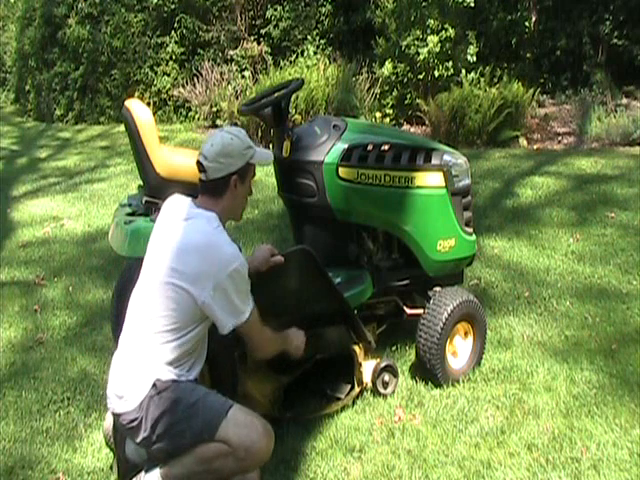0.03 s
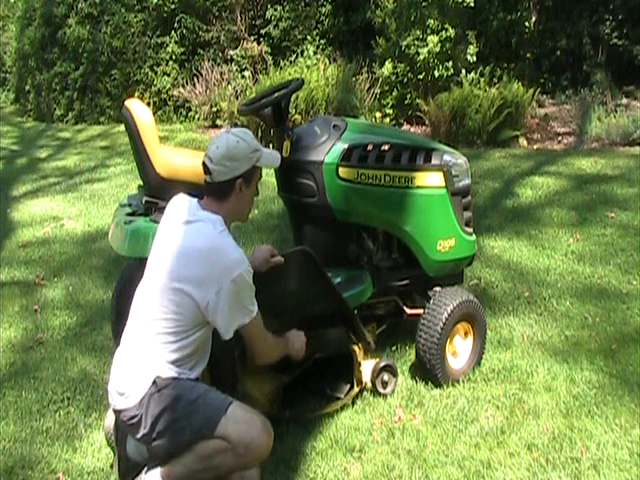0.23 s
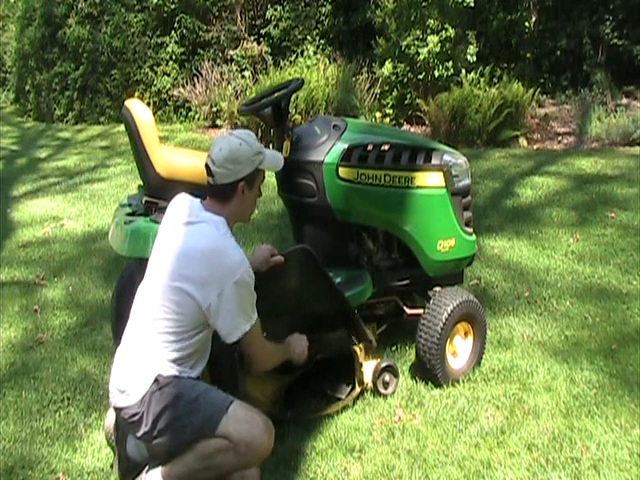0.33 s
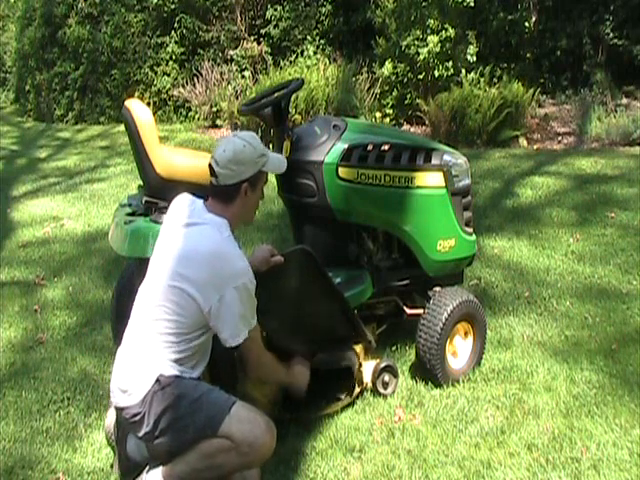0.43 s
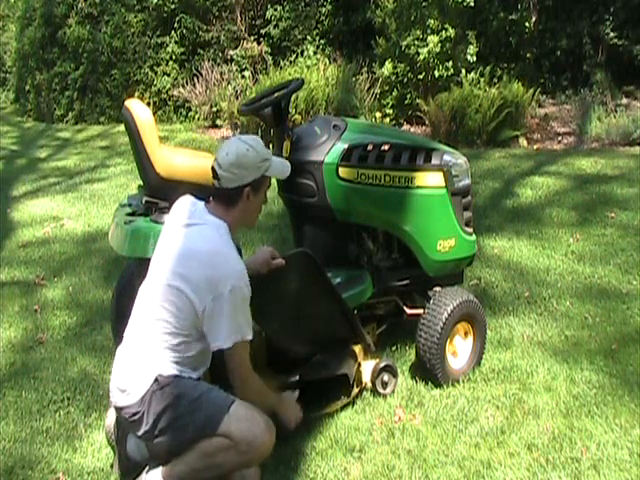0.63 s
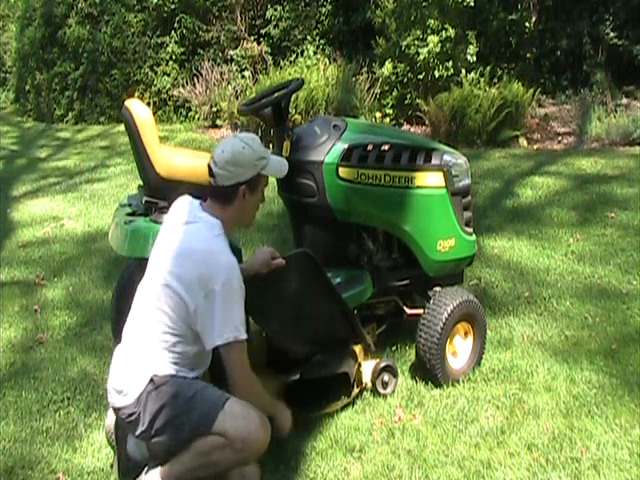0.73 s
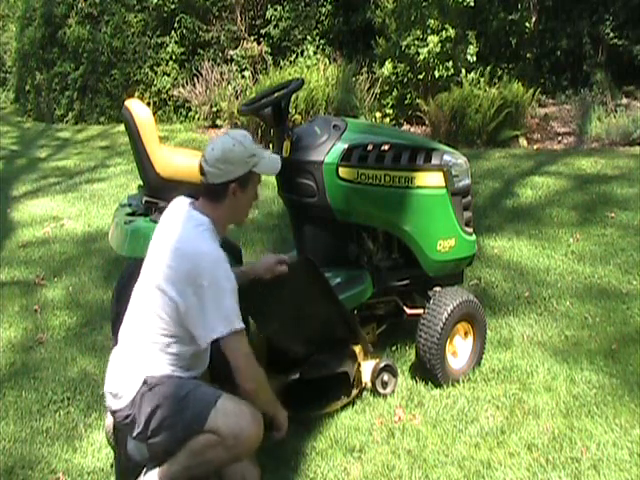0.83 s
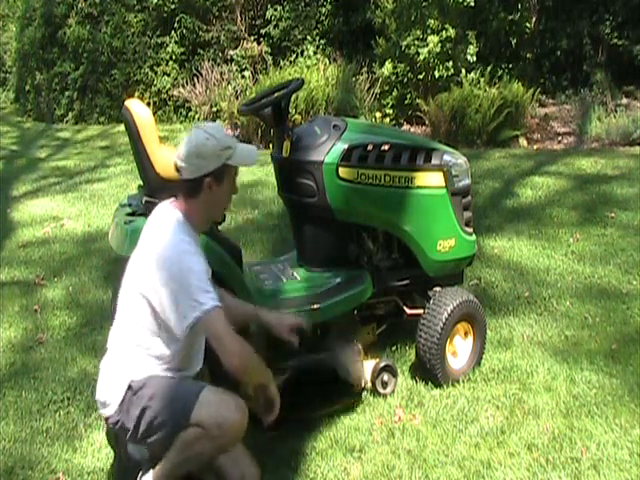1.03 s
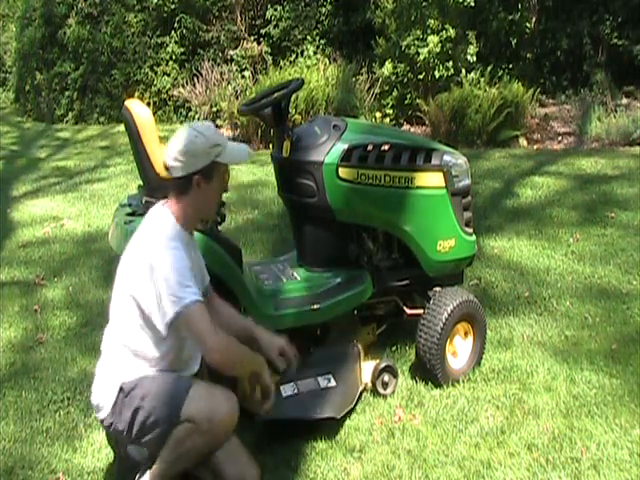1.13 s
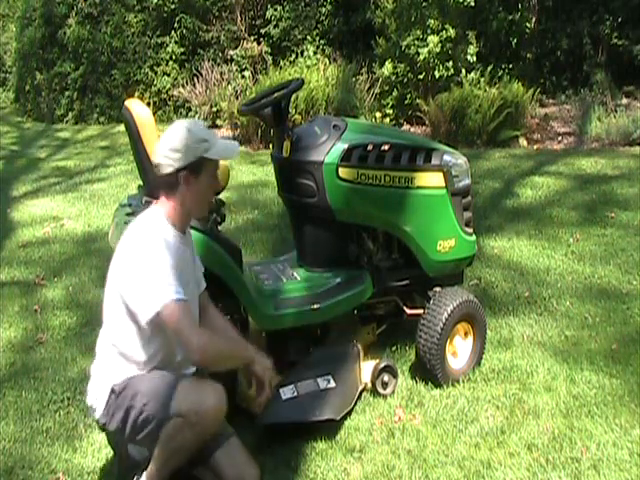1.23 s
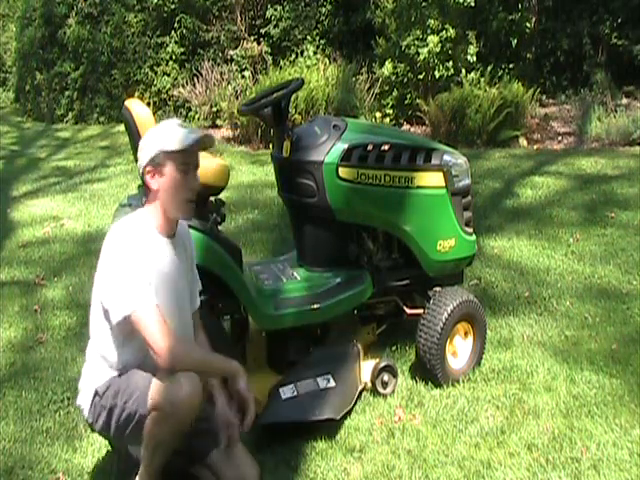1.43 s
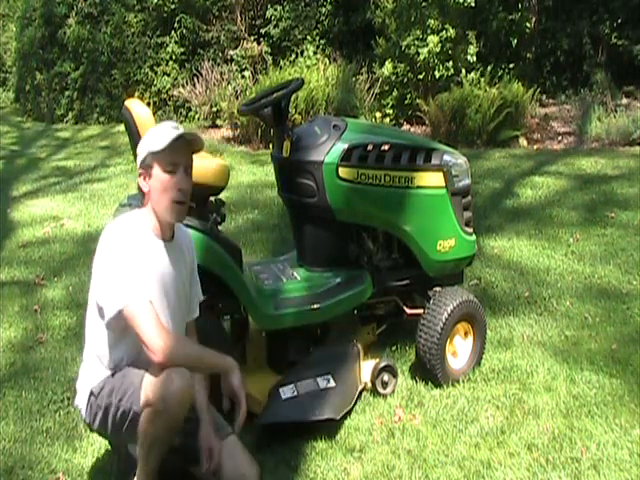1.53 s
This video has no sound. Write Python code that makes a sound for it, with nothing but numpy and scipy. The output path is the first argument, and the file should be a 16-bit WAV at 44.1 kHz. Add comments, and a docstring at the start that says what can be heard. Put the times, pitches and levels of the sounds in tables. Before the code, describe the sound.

Hard plastic flap on a mower deck bangs down twice, rattling, with thin metallic spring squeaks between

```python
"""A quiet lawn: a hand works the plastic chute of a lawn mower deck, close to a stereo microphone.
The chute knocks on the deck, is let go and slams down with a few bounces: click trains ring decaying modes and
noise, with steel ticks on top. The steel hinge rod and spring scrape in short slips: grit clicks rasp and excite
narrow resonances, and thin gliding noise squeaks. Reflections are decaying noise; behind lie a far bird chirp
and distant rumble and hiss, made of drifting coloured noise."""
import sys
import numpy as np
from scipy import signal
from scipy.fft import rfft, irfft
from scipy.io import wavfile
from scipy.ndimage import uniform_filter1d

SR = 44100
rng = np.random.default_rng(int(sys.argv[2]) if len(sys.argv) > 2 else 0)


def gain_from_db(level_db):
    """Turn a decibel level (scalar or array-like) into a linear amplitude factor."""
    decades = np.asarray(level_db, float) / 20
    return 10 ** decades


def dump(signal):
    """Clip the signal to [-1, 1] and save it as 16-bit WAV at the path in sys.argv[1]."""
    limited = np.clip(np.atleast_2d(signal).T, -1, 1)
    pcm = np.round(limited * 32767).astype(np.int16)
    wavfile.write(sys.argv[1], SR, pcm)


N = 70560


def evened(x):
    """Brings a signal to an rms of 1."""
    return x / np.sqrt(np.mean(x ** 2) + 1e-20)


def read(points, hz):
    """Reads a curve of (frequency [Hz], value) points along log frequency."""
    f, value = np.transpose(points)
    return np.interp(np.log(hz + 1), np.log(f + 1), value)


def add(mix, s, sound):
    """Lays a sound into the mix from s seconds; a start before zero is moved to zero."""
    part = mix[max(round(s * SR), 0):][:len(sound)]
    part += sound[:len(part)]


def colour(x, points):
    """Filters a signal by a spectrum curve in dB, floored at -90 dB."""
    hz = np.fft.rfftfreq(x.shape[-1], 1 / SR)
    gain = gain_from_db(np.maximum(read(points, hz), -90))
    return irfft(rfft(x) * gain, x.shape[-1])


def dying_noise(t60_points, count, tone=((20, 0), (20000, 0))):
    """Coloured noise whose bands die at their own speed, energy 1."""
    hz, t, z = signal.stft(rng.standard_normal(count), SR, nperseg=256)
    decay_db = 60 * t / read(t60_points, hz)[:, None]
    z = z * gain_from_db(read(tone, hz)[:, None] - decay_db)
    tail = signal.istft(z, SR, nperseg=256)[1][:count]
    return tail / np.linalg.norm(tail)


def clicks(per_s, spread_db, count):
    """Random clicks of either sign, many small and few large: a rough contact."""
    u = rng.random((count, 3))
    struck = u[:, 0] < per_s / SR
    sign = np.sign(u[:, 1] - .5)
    return struck * sign * gain_from_db(-spread_db * np.log(u[:, 2] + 0.00059))


def ring(modes, t):
    """One blow: decaying sine modes, each a little detuned and of uneven strength."""
    detune, spread_db = .02, 2.0  # standard deviations: share of the pitch, dB
    d = rng.standard_normal((len(modes), 2))
    out = np.zeros(len(t))
    for (hz, db, t60), (a, b) in zip(modes, d):
        decay = gain_from_db(db + spread_db * b - 60 * t / t60)
        out += decay * np.sin(2 * np.pi * hz * (1 + detune * a) * t)
    return out


def knock(modes, shell_db, db, focus_hz, rattle_s):
    """A hard first contact and a short rattle, coloured by the place struck, ring the modes and the dense shell;
    contacts that favour a higher pitch add a stronger bright crack."""
    # dense shell ring: (frequency [Hz], relative level [dB per Hz])
    clatter = [(35, -52), (60, -10.5), (509, -6.5), (721, -6), (1630, -6.5), (2050, -6.5), (2250, -4),
               (4420, -12), (6870, -15), (15500, -51)]
    # decay of the shell ring: (frequency [Hz], t60 [s])
    clatter_t60 = [(100, 0.37), (500, 0.17), (2000, 0.093), (10000, 0.027)]
    rattle_per_s, first_contact, contact_q = 1500, 3.5, 1.5
    crack_db, crack_t60, crack_full_hz = -3.5, 0.055, 2500
    t = np.arange(round(.5 * SR)) / SR
    hits = clicks(rattle_per_s, 3.03, len(t)) * np.exp(-t / rattle_s)
    hits[0] = first_contact
    w = 2 * np.pi * focus_hz
    bandpass = signal.bilinear([w, 0], [1, w / contact_q, w * w], SR)
    drive = signal.lfilter(*bandpass, hits)
    drive = signal.lfilter(*signal.butter(1, min(2 * focus_hz, 15000), fs=SR), drive)
    rings = ring(modes, t)
    shell = dying_noise(clatter_t60, len(t), clatter)
    body = rings / np.linalg.norm(rings) + gain_from_db(shell_db) * shell
    out = signal.fftconvolve(drive, body)[:len(t)] * (1 - t / t[-1])
    burst = dying_noise([(100, crack_t60), (10000, crack_t60)], 4000, clatter)
    crack = signal.fftconvolve(hits, burst)[:len(t)]
    head = round((rattle_s + 0.0039) * SR)  # the opening that sets the level
    crack *= gain_from_db(crack_db + shell_db) * (focus_hz / crack_full_hz) ** 2 / np.std(crack[:head])
    return 0.38 * gain_from_db(db) * (out / np.std(out[:head]) + crack)


def chute():
    """Plastic on the deck: knocks ring chute and deck together, taps ring the lifted chute alone."""
    # knocks: (time [s], level ahead of the common gain [dB], pitch favoured by the contact [Hz],
    # rattle decay time [s])
    knocks = [(.135, -26, 306, 0.0015), (0.188, -24, 610, 0.0014), (0.283, -30, 800, 0.0036),
              (0.338, -32, 1860, 0.00067), (0.55, -17, 930, 0.015), (0.5692, -2, 1820, 0.0037),
              (.573, -9, 282, 0.0028), (.578, -9, 620, 0.0092), (.592, -13.5, 950, 0.0027),
              (0.626, -22, 795, .01), (0.636, -19, 297, 0.0047), (0.646, -20, 1320, 0.0043),
              (.663, -21, 516, 0.0017), (0.684, -24.5, 296, .005), (0.704, -27, 2200, 0.0033),
              (0.71, -23, 324, 0.002), (0.738, -26.5, 196, .004), (0.769, -27.5, 1940, 0.0054),
              (0.786, -27.5, 338, 0.0075), (0.796, -31, 2500, 0.009), (1.181, -6, 2330, 0.0013),
              (1.185, -4.5, 1150, 0.0045), (1.186, -13, 129, 0.0034), (1.191, -6, 2500, 0.0061),
              (1.197, -4, 550, 0.0019), (1.214, -7, 560, 0.0033), (1.225, -10.5, 560, 0.005),
              (1.24, -11, 900, 0.0071), (1.256, -18.5, 1090, .006), (1.272, -19.5, 610, 0.0054),
              (1.289, -26.5, 3060, 0.0029), (1.305, -20, 470, 0.0057), (1.335, -24, 720, 0.0043),
              (1.36, -29.5, 396, 0.0047)]
    # taps on the lifted chute: same columns as the knocks
    taps = [(.062, -32, 1030, 0.0015), (0.131, -22.5, 930, 0.0061), (0.473, -27.5, 990, 0.0033),
            (.493, -10, 960, 0.0021)]
    # chute and deck together: (frequency [Hz], relative level [dB], t60 [s])
    deck_modes = [(128.6, -10, 0.089), (209, -9, 0.069), (301.4, -2, 0.062), (367.5, -5.5, 0.077),
                  (470, -10, 0.08), (518, 0, 0.085), (601, -5, 0.057), (847, -7, 0.038), (1101, -3, 0.093),
                  (1526, -4, 0.069), (1680, -2.5, 0.048), (2200, -6, 0.035), (2660, -8, 0.036),
                  (3170, -1.5, 0.031)]
    # lifted chute alone: (frequency [Hz], relative level [dB], t60 [s])
    lifted_modes = [(390, 2, 0.059), (834.5, 0, 0.038), (1217, 2, 0.022), (1514, -2, 0.12)]
    knock_shell_db, tap_shell_db = 2, -9
    out = np.zeros(N)
    for s, *contact in knocks:
        add(out, s, knock(deck_modes, knock_shell_db, *contact))
    for s, *contact in taps:
        add(out, s, knock(lifted_modes, tap_shell_db, *contact))
    return out


def steel_ticks():
    """Steel touching: one brief sine ring in a splash of bright noise."""
    # ticks: (time [s], level [dB], pitch [Hz])
    ticks = [(0.106, -27, 8400), (0.133, -32, 7000), (0.281, -32, 6730), (.569, -25, 4750),
             (0.572, -29, 7200), (.641, -17, 8470), (.648, -11, 6810), (0.648, -17, 4770),
             (.701, -34, 4900), (0.717, -36, 10400), (.722, -25.5, 7000), (.767, -33, 5650),
             (.945, -59, 6000), (1.182, -24, 11300), (1.184, -12.5, 7870), (1.194, -12, 6750),
             (1.225, -16, 6570), (1.231, -19, 3530), (1.29, -27, 3600)]
    ring_t60, splash_db, splash_t60 = 0.011, -12.5, 0.032
    splash_band = signal.butter(2, (2500, 11800), "band", fs=SR)
    out, t = np.zeros(N), np.arange(2500) / SR
    for s, db, hz in ticks:
        splash = evened(signal.lfilter(*splash_band, rng.standard_normal(len(t))))
        splash = splash * gain_from_db(splash_db - 60 * t / splash_t60)
        tone = gain_from_db(-60 * t / ring_t60) * np.sin(2 * np.pi * hz * t)
        add(out, s, gain_from_db(db) * (tone + splash))
    return out


def hinge():
    """Dense grit clicks under each slip give a rasp and excite the narrow modes of the rod."""
    # slips: (start [s], length [s], rasp level [dB], change over the slip [dB], rod ring gain [dB])
    slips = [(-.02, 0.13, -37, -1, 6.5), (0.119, 0.015, -32, -15, -12), (.188, 0.077, -34.5, 1.5, 5),
             (0.323, .13, -36, 0, 3.5), (.500, 0.099, -36, 6, 6), (0.61, 0.045, -38, 9.5, 0),
             (0.777, 0.046, -31.5, -4, -2), (0.983, 0.037, -36, -2.5, 4), (1.156, 0.081, -39, 1.5, 7),
             (1.244, 0.028, -31.5, 1.5, -5.5), (1.303, 0.062, -36.5, -15, -10), (1.37, .045, -41.5, 5.5, 3)]
    # rasp spectrum: (frequency [Hz], relative level [dB per Hz])
    rasp = [(410, -9.5), (700, -9.5), (1290, -9), (1730, -5), (3070, -16.5), (3400, -7.5), (5080, -10.5),
            (5360, -16.5), (6260, -11.5), (8210, -2), (8990, -7.5), (15500, -57)]
    # rod and spring modes: (frequency [Hz], width [Hz], relative level [dB])
    rod = [(1413, 17, -24), (1733, 17, -22.5), (1936, 17, -20.5), (2240, 29, -29), (2676, 21, -22.5),
           (3894, 50, -24), (4240, 14, -21), (5394, 32, -14.5), (7380, 20, -21.5), (7720, 61, -12.5),
           (8350, 46, -18), (8145, 31, -18), (8725, 180, -23.5), (10030, 46, -21.5), (11030, 400, -21.5),
           (13700, 87, -30)]
    grains_per_s, grain_spread_db, waver_db = 5000, 2, 3.0
    rise_s, fall_t60, tail_db, tail_t60 = .003, 0.058, -39, .2
    t, press, rod_press = np.arange(N) / SR, np.zeros(N), np.zeros(N)
    for start, length, db, change_db, ring_db in slips:
        u = t - start
        past = np.maximum(u - length, 0)
        fall = gain_from_db(-60 * past / fall_t60) + gain_from_db(tail_db - 60 * past / tail_t60)
        level = gain_from_db(db + change_db * np.clip(u / length, 0, 1))
        slip = np.clip(u / rise_s, 0, 1) * level * fall
        press += slip
        rod_press += slip * gain_from_db(ring_db)
    grit = evened(clicks(grains_per_s, grain_spread_db, N))
    out = press * evened(colour(grit, rasp))
    for hz, width, db in rod:
        r = np.exp(-np.pi * width / SR)
        poles = [1, -2 * r * np.cos(2 * np.pi * hz / SR), r * r]
        waver = gain_from_db(waver_db * evened(uniform_filter1d(rng.standard_normal(N), 1500)))
        scale = np.std(signal.lfilter([1, 0, -1], poles, grit))
        out += gain_from_db(db) / scale * signal.lfilter([1, 0, -1], poles, grit * waver * rod_press)
    return out


def squeaks():
    """Spring squeaks: a steady tone and noise narrowed to a thin band, shifted onto a gliding pitch."""
    # squeaks: (start [s], length [s], first pitch [Hz], last pitch [Hz], relative level [dB])
    glides = [(-.02, 0.13, 5420, 5400, -37.5), (0.171, 0.11, 5400, 5450, -56),
              (0.219, 0.06, 2680, 2660, -42), (0.33, 0.089, 5400, 5270, -32), (.34, 0.057, 8150, 8370, -26),
              (.385, 0.068, 8150, 8190, -26.5), (0.401, 0.063, 5270, 5220, -37),
              (0.514, .085, 5380, 5600, -39), (.588, .03, 5850, 6150, -33.5),
              (0.646, 0.0334, 2680, 2660, -30), (0.809, 0.024, 5400, 5400, -41.5),
              (1.238, .02, 7100, 7130, -32), (1.252, 0.027, 8300, 8380, -28),
              (1.264, 0.017, 5400, 5340, -33), (1.312, 0.013, 5400, 5400, -38.5),
              (1.379, 0.013, 5620, 5600, -40), (1.38, 0.039, 4240, 4240, -42),
              (1.39, .014, 6130, 6200, -36), (1.404, 0.036, 5380, 5340, -47)]
    width_hz, steady, swell = 140, .4, 0.42
    r = np.exp(-np.pi * width_hz / SR)
    out = np.zeros(N)
    for start, length, first_hz, last_hz, db in glides:
        u = np.linspace(0, 1, round(length * SR))
        a, b = rng.standard_normal((2, 8000))
        fuzz = signal.lfilter([1], [1, -r], a + 1j * b)
        fuzz = signal.lfilter([1], [1, -r], fuzz)[-len(u):]
        fuzz = steady + fuzz / np.sqrt(np.mean(abs(fuzz) ** 2))
        phase = 2 * np.pi * np.cumsum(first_hz + (last_hz - first_hz) * u) / SR
        tone = (fuzz * np.exp(1j * phase)).real
        add(out, start, gain_from_db(db) * abs(np.sin(np.pi * u)) ** swell * tone)
    return out


def near_reflections(sound):
    """Left-right difference of the near sounds: two short noise tails, crossfading in a circle."""
    # side share of the near sounds: (frequency [Hz], level [dB])
    side_colour = [(100, -43), (1000, -71), (2500, -31), (5000, -16.5), (8000, -19.5), (13000, -16.5)]
    t60 = [(100, 0.035), (10000, 0.12)]  # (Hz, s)
    a, b = (signal.fftconvolve(sound, dying_noise(t60, 2500))[:N] for _ in "ab")
    turn = 2 * np.pi * 7 * np.arange(N) / SR  # 7 Hz: steady turn between the tails, so the side keeps varying
    side = colour(a * np.cos(turn) + b * np.sin(turn), side_colour)
    return side * np.array([[1], [-1]])


def yard(sound):
    """Echo of the yard: a longer noise tail whose treble dies sooner."""
    t60, db = 0.76, -11
    tail = dying_noise([(100, t60), (10000, t60 * 0.39)], 30000)
    return gain_from_db(db) * signal.fftconvolve(sound, tail)[:N]


def bird():
    """One far chirp: a rising sine that swells late and fades."""
    # chirp: (start [s], length [s], first pitch [Hz], last pitch [Hz], relative level [dB])
    chirp = (1.09, .05, 3900, 5300, -60)
    start, length, first_hz, last_hz, db = chirp
    out, u = np.zeros(N), np.arange(0, 1, 1 / (length * SR))
    phase = 2 * np.pi * np.cumsum(first_hz + (last_hz - first_hz) * u) / SR
    add(out, start, gain_from_db(db) * np.sin(np.pi * u) * u * 2 * np.sin(phase))
    return out


def air():
    """Distant rumble and hiss: stereo noise with drifting patches, more alike left and right in the bass."""
    # background spectrum: (frequency [Hz], relative level [dB])
    air_colour = [(15, -36), (25, -8), (136, 3), (274, -6), (445, -8.5), (782, -12), (1110, -15),
                  (1340, -21), (1450, -15), (2120, -21.5), (2300, -17), (15500, -41)]
    # left-right likeness: (frequency [Hz], correlation [0 to 1])
    likeness = [(60, 1), (240, 0.79), (950, 0.62), (3770, 0.3), (15000, 0.05)]
    level_db, patch_db = -41, 0.5
    frames, hz = N // 256 + 5, np.fft.rfftfreq(1024, 1 / SR)
    a, b, c, d, patches = rng.standard_normal((frames, 513, 5)).T
    patches = uniform_filter1d(patches, 8, 0)  # across frequency
    patches = evened(uniform_filter1d(patches, 12, 1))  # along time
    same = np.clip(read(likeness, hz), -1, 1)[:, None]
    left = a + 1j * b
    right = same * left + np.sqrt(1 - same ** 2) * (c + 1j * d)
    z = np.array([left, right]) * gain_from_db(read(air_colour, hz)[:, None] + patch_db * patches)
    return gain_from_db(level_db) * evened(signal.istft(z, nperseg=1024, noverlap=768)[1][:, :N])


def scene():
    """Near sounds in the middle, their reflections to the sides and from the yard, then the background."""
    steel = hinge() + squeaks()
    plastic = chute() + steel_ticks()  # the ticks share the chute's reflections
    sides = near_reflections(plastic + steel * gain_from_db(2.5))
    echo = yard(plastic + steel * gain_from_db(-6))
    return steel + plastic + echo + sides + bird() + air()


def low_pass(x):
    """Removes everything above the highest recorded frequency."""
    return signal.sosfilt(signal.butter(12, 15900, fs=SR, output="sos"), x)


def record(dry):
    """The microphone drops the deepest bass, and peaks are clipped at full scale."""
    heard = signal.lfilter(*signal.butter(2, 49.3, "high", fs=SR), dry)  # Hz
    return low_pass(np.clip(heard, -1, 1))


dry = scene()
out = record(dry)
dump(out)
```